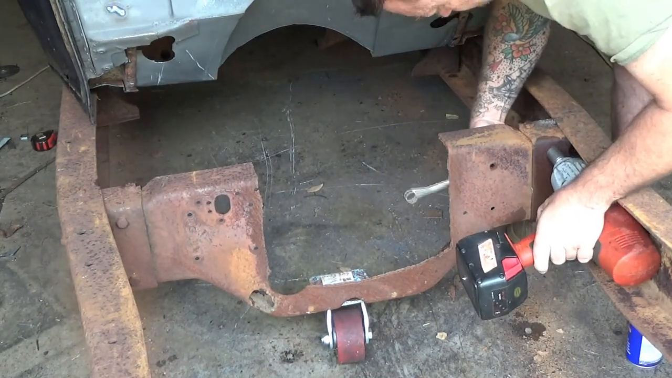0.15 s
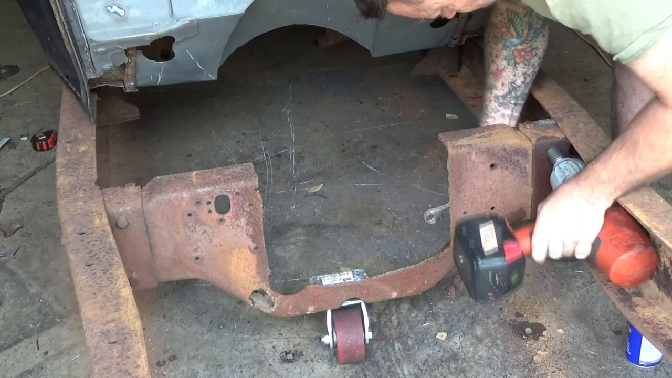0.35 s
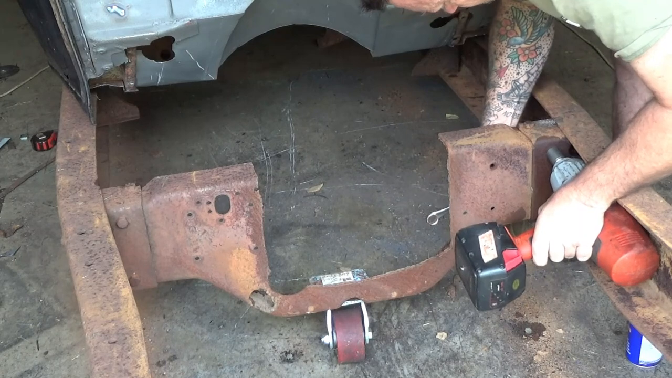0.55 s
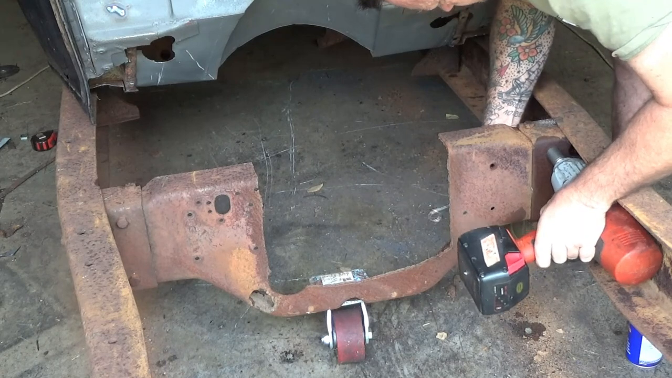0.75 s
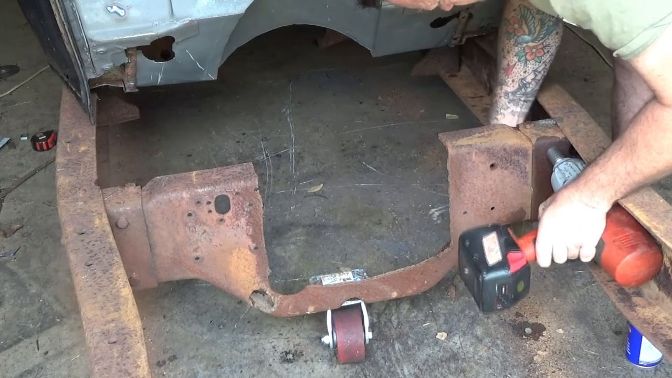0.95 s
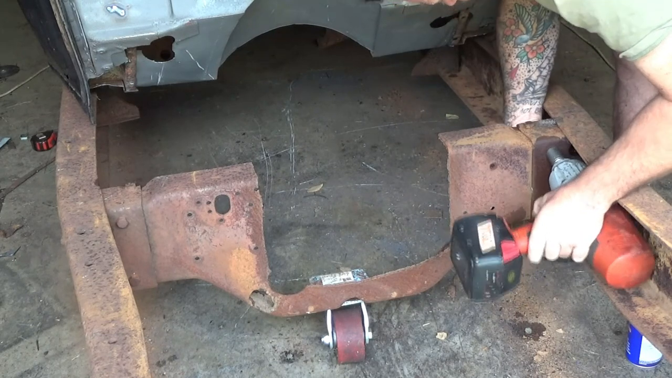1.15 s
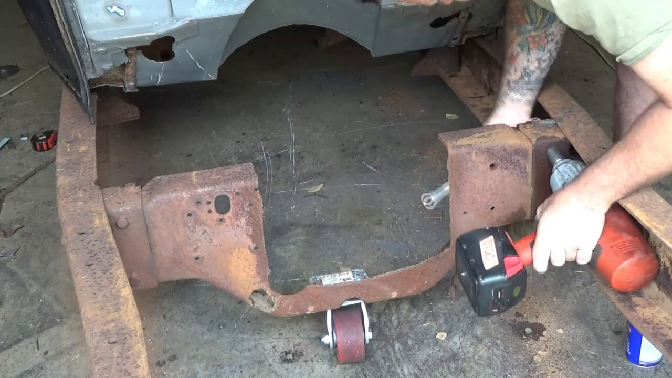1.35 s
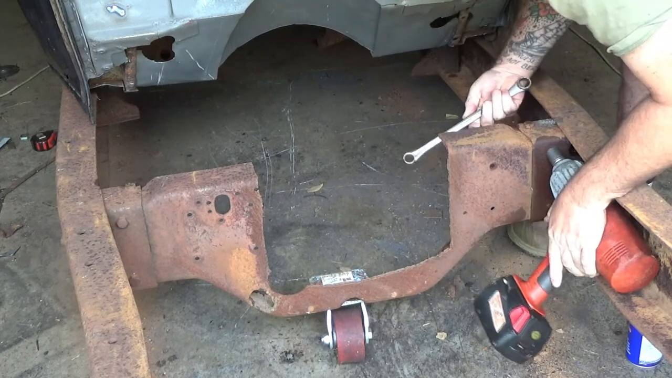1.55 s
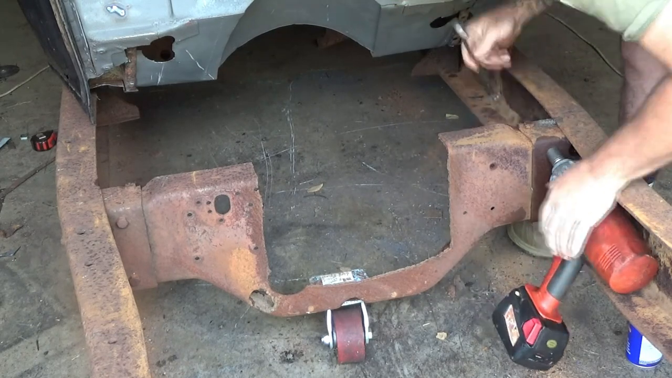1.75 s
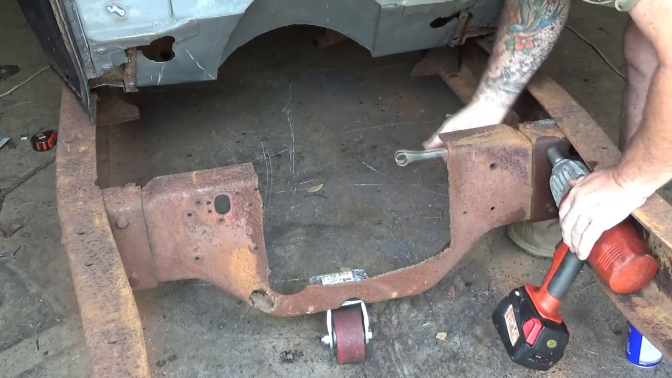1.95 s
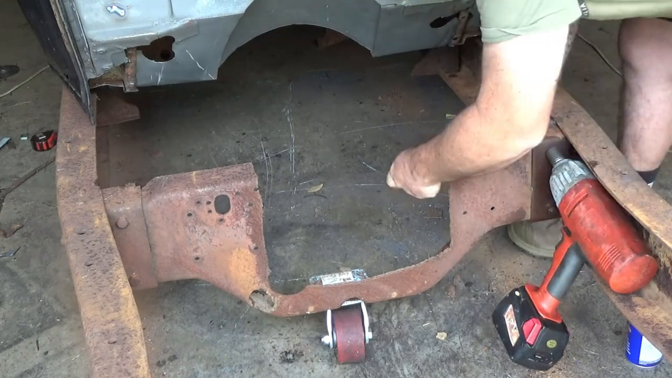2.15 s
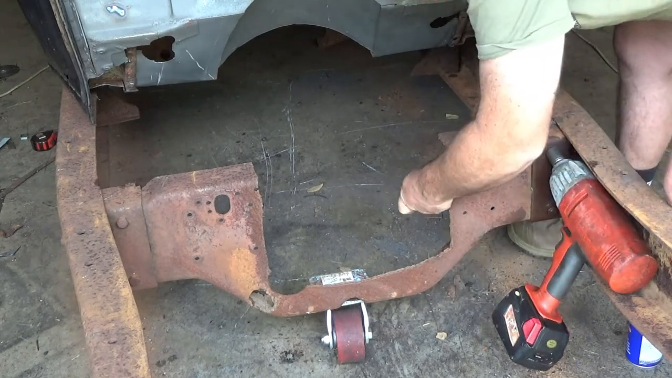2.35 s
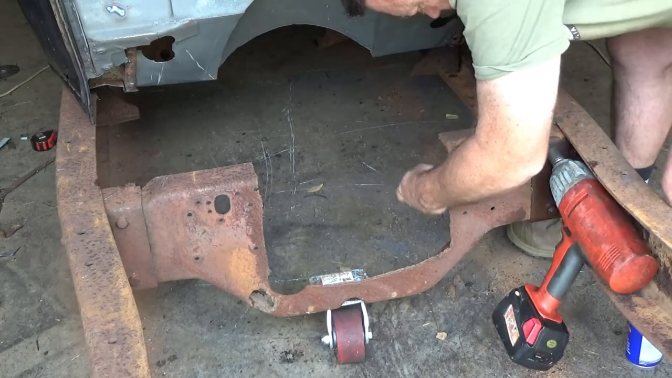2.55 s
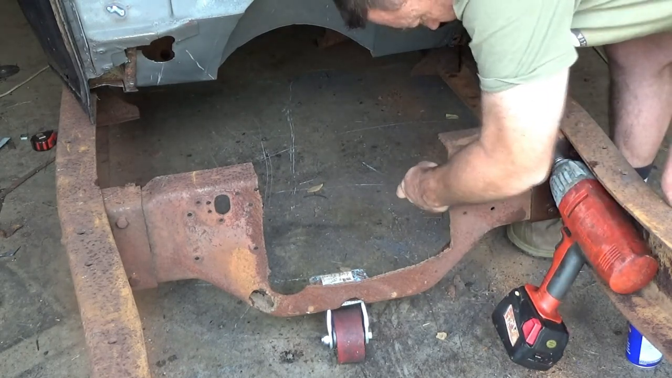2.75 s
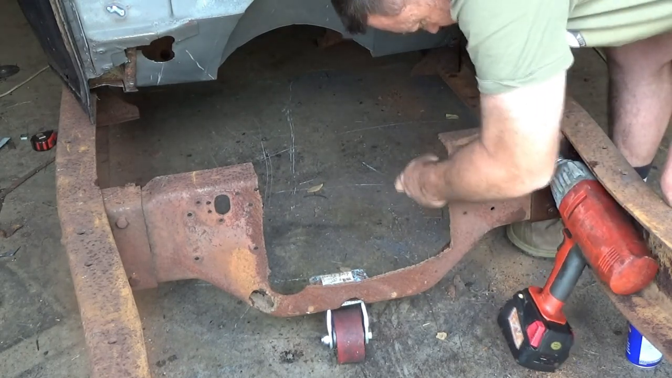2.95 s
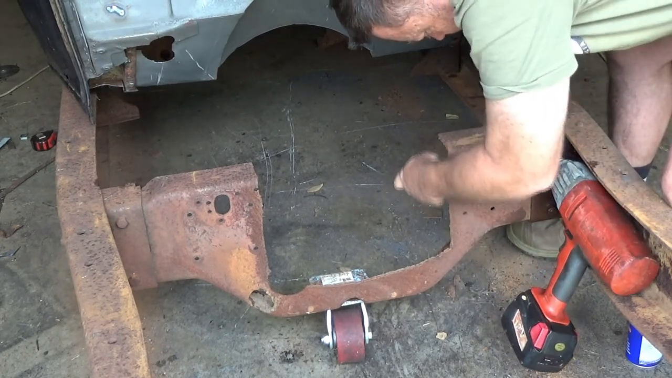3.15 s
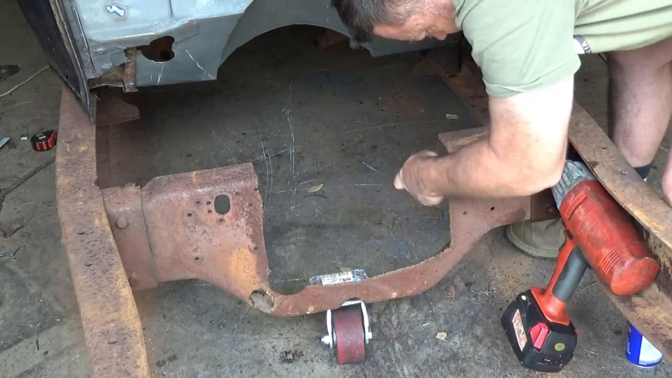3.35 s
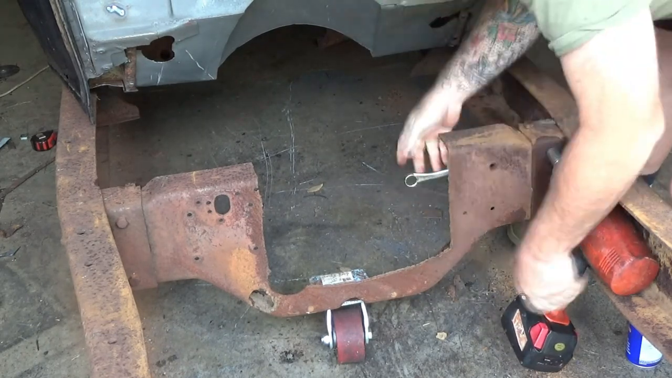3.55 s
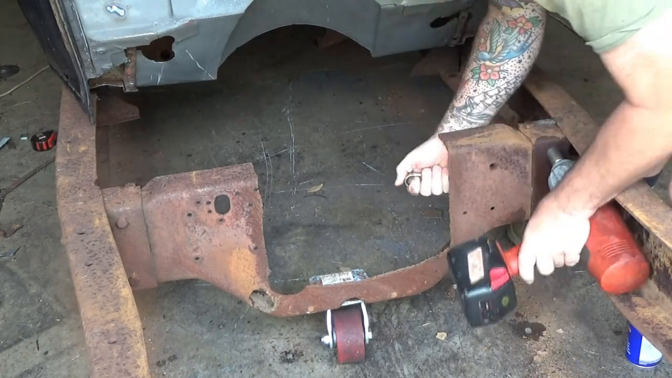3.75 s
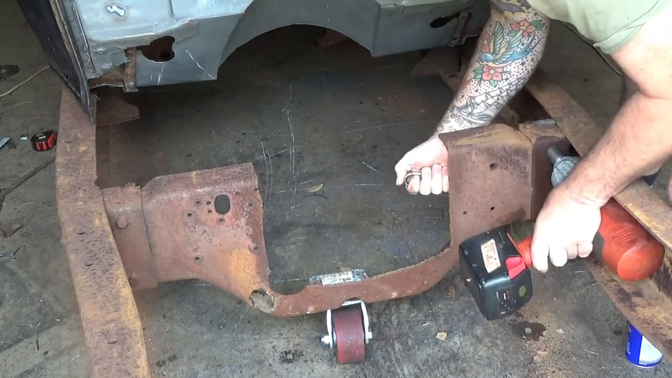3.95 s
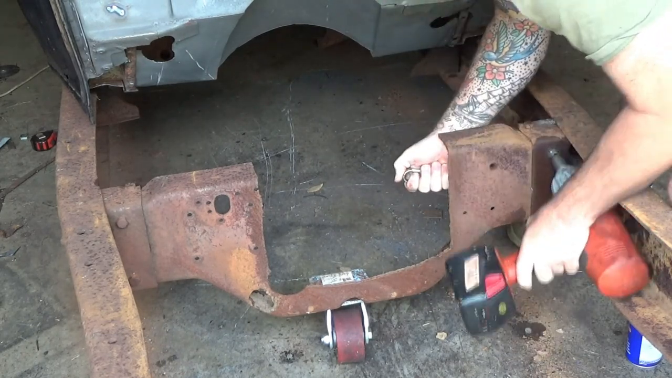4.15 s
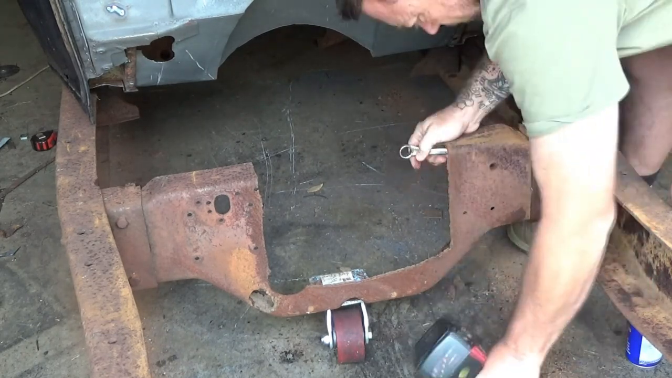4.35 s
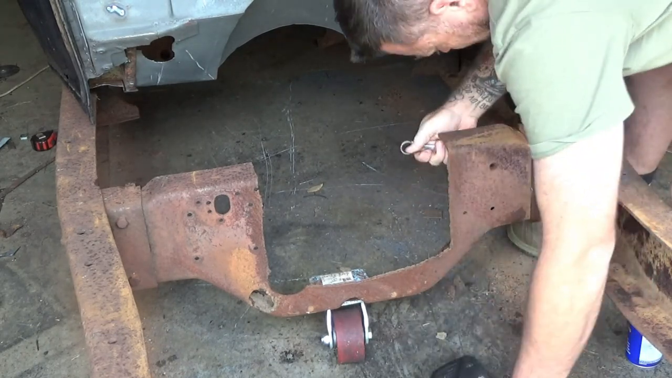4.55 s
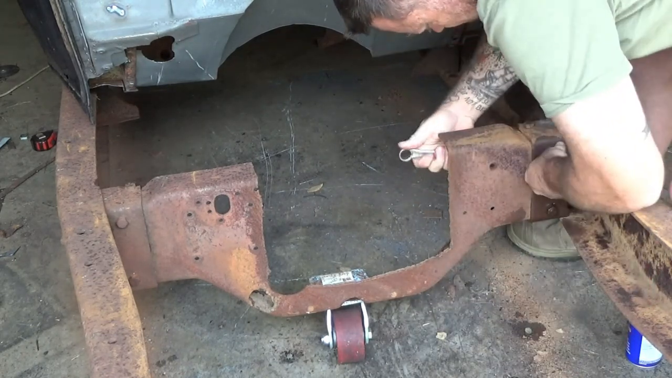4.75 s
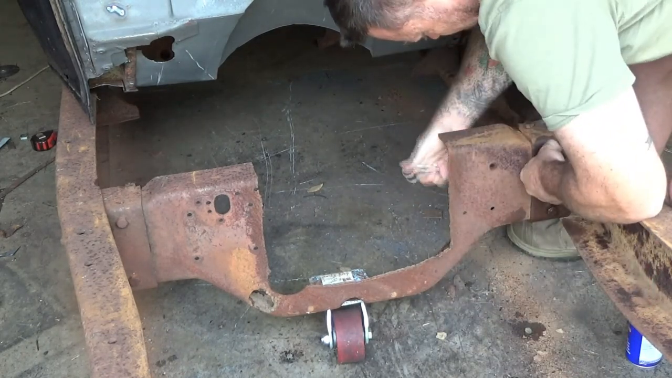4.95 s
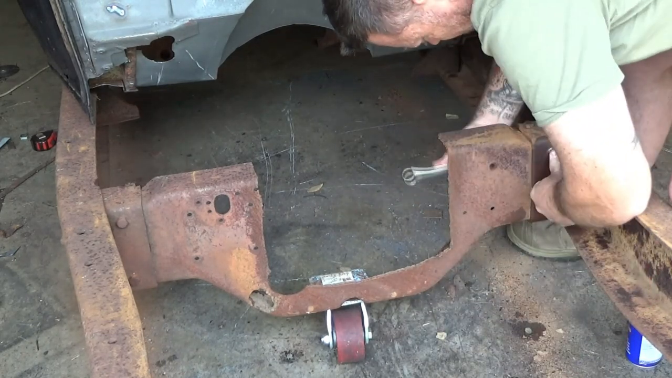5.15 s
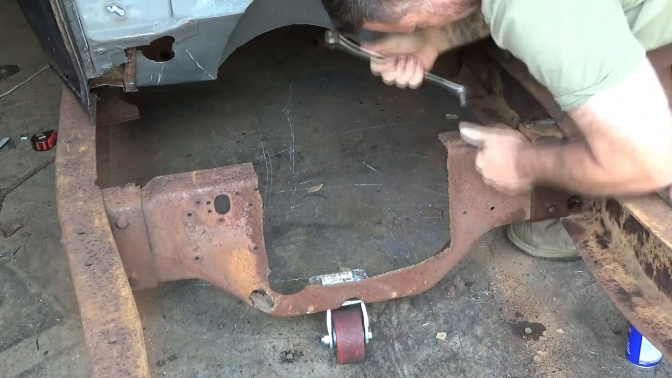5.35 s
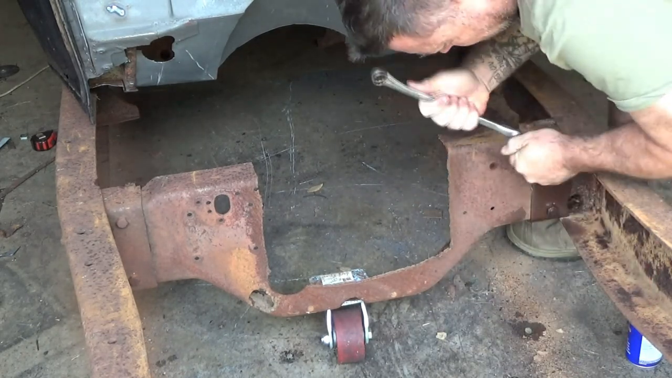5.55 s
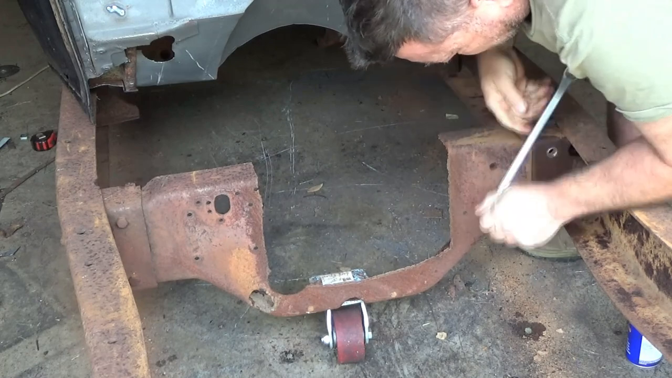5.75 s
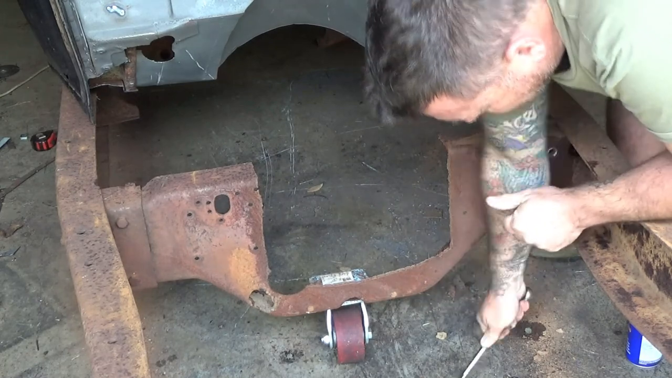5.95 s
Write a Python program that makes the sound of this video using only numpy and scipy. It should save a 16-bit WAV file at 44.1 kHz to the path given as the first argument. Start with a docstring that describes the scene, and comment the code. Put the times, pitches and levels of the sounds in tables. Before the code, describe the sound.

A cordless impact wrench rattles on a bolt in two short bursts, with metal tools knocking and clinking on a steel frame between and after.

```python
"""In a garage, hands shuffle and tools knock on a rusty steel frame, which rings and booms. A cordless
impact wrench rattles on a bolt in a short burst, its hammer striking while its gears grind. Very high
chirps and a faint trill come and go as a spanner and the wrench knock on the steel. After a soft thump
the wrench rattles again and more knocks follow. Last, the spanner is dragged on the steel and clinks
down on the concrete. The quiet hiss of the room lies under it all."""
import sys
import numpy as np
from scipy import signal
from scipy.fft import rfft, irfft
from scipy.io import wavfile
from scipy.ndimage import uniform_filter1d

SR = 44100
rng = np.random.default_rng(int(sys.argv[2]) if len(sys.argv) > 2 else 0)


def log_audio(samples):
    """Write samples as a 16-bit WAV file to the path given in sys.argv[1]."""
    # one column per channel
    frames = np.atleast_2d(samples).T
    # limit to full scale, then quantise
    limited = np.clip(frames, -1, 1)
    pcm = np.round(limited * 32767).astype(np.int16)
    wavfile.write(sys.argv[1], SR, pcm)


N = 268128
CREST_DB = 11.5  # how far the peak of a noisy hit stands over its average (rms) level


def gain_of(db):
    """Turns decibels into a number to multiply by."""
    return 10 ** (np.asarray(db) / 20)


def unit_rms(x):
    """Scales a signal to an average (rms) size of 1."""
    return x / np.sqrt(np.mean(x ** 2) + 1e-20)


def value_at(points, hz):
    """Reads a curve of (f/Hz, value) points, giving each octave about equal room."""
    f, value = np.transpose(points)
    return np.interp(np.log(hz + 1), np.log(f + 1), value)


def follow(rows, t):
    """Reads rows of (t/s, level/dB, ...) at times t; silent before and after them."""
    times, level_db, *rest = np.transpose(rows)
    return [np.interp(t, times, level_db, -120, -120)] + [np.interp(t, times, column) for column in rest]


def add(mix, s, sound):
    """Mixes a sound in at s seconds."""
    part = mix[..., max(round(s * SR), 0):][..., :sound.shape[-1]]
    part += sound[..., :part.shape[-1]]


def split(x, low_hz, high_hz):
    """Splits x into bass, middle and treble that add up to x."""
    hz, spectrum = np.fft.rfftfreq(x.shape[-1], 1 / SR), rfft(x)
    low, high = 1 / (1 + (hz / low_hz) ** 4), 1 / (1 + (high_hz / (hz + 1)) ** 4)
    return [irfft(spectrum * band, x.shape[-1]) for band in (low, 1 - low - high, high)]


def noise(colour, patchy_db, size=512, count=N):
    """Stereo noise whose colour (its level at each frequency) drifts in random patches."""
    # how alike left and right are: f/Hz, likeness (1 = the same)
    likeness = [(60, 0.73), (180, 1), (550, 0.87), (1650, 0.74), (4970, 0.83), (15000, 0.24)]
    frames, hz = 4 * count // size + 5, np.fft.rfftfreq(size, 1 / SR)
    a, b, c, d, patches = rng.standard_normal((frames, len(hz), 5)).T
    patches = unit_rms(uniform_filter1d(uniform_filter1d(patches, size=8, axis=0), size=10, axis=1))
    same, left = value_at(likeness, hz)[:, None], a + 1j * b
    right = same * left + np.sqrt(1 - same ** 2) * (c + 1j * d)
    spectra = np.array([left, right]) * gain_of(value_at(colour, hz)[:, None] + patchy_db * patches)
    return unit_rms(signal.istft(spectra, nperseg=size, noverlap=size - size // 4)[1][:, :count])


def room_tone(loud):
    """The room's quiet hiss sinks under loud sounds and creeps back afterwards."""
    # colour of the hiss: f/Hz, level/dB
    colour = [(15, -49), (25, -42.5), (394, -0.5), (476, -6.5), (560, 1), (1160, -10.5), (1790, -17.5),
              (2550, -13), (3720, -25), (5000, -21.5), (16000, -10.5)]
    loud_db = 10 * np.log10(abs(uniform_filter1d((loud ** 2).mean(0), size=400)) + 1e-12)
    ramp_db = 54 * np.arange(N) / SR
    held_db = np.maximum.accumulate(loud_db + ramp_db) - ramp_db  # jumps up at once, falls slowly
    dip_db = 0.3 * np.maximum(held_db + 47.5, 0)
    return gain_of(-70 - dip_db) * noise(colour, patchy_db=2.5, size=1024)


def shuffle():
    """Hands and tools rustle in the background: noise roughened by small random ticks."""
    # level and brightness of the rustle, which dulls after loud sounds: t/s, level/dB, treble boost/dB
    rustle_curve = [(0.0, -63, 9), (0.045, -74.5, -13), (0.085, -61, -4), (0.172, -67.5, 5), (0.37, -73, 6),
                    (1.0, -45.5, -29), (1.266, -74, -30.5), (1.488, -67.5, -3.5), (1.598, -71, -1),
                    (2.022, -70, 2.5), (2.36, -64, 1.5), (3.024, -64.5, 0.5), (3.202, -59.5, 1.5),
                    (3.42, -64.5, -2), (3.52, -58.5, 0), (4.2, -58, -11), (4.328, -51.5, -47),
                    (4.644, -70, 5), (4.828, -64.5, -7.5), (5.2, -69, 4.5), (5.37, -63, -3.5),
                    (5.696, -68.5, 3.5), (5.886, -60.5, 1.5), (6.08, -68, 2)]
    rustle = noise([(300, -14.5), (900, -4), (4000, -8.5), (9000, -6), (15000, -7)], patchy_db=3)
    bass, middle, treble = map(unit_rms, split(rustle, 740, 5000))
    ticks = (rng.random(N) < 30 / SR) * rng.exponential(1, N)  # about 30 a second
    grain = 1 + 0.077 * signal.oaconvolve(ticks, np.exp(-np.arange(1500) / SR / 0.0022))[:N]
    level_db, treble_db = follow(rustle_curve, np.arange(N) / SR)
    return grain * gain_of(level_db) * (gain_of(-9.5) * bass + middle + gain_of(treble_db) * treble)


def ring(hz, t60, t):
    """One dying note of struck metal; t60 is the time it takes to fade by 60 dB."""
    note = np.sin(2 * np.pi * hz * t) * gain_of(-60 * t / t60)
    return note / np.linalg.norm(note)


def steel_frame(t, spread_db=0):
    """The tapped frame rings with many notes; spread_db varies their mix, as if hit on another spot."""
    # the frame's notes: f/Hz, level/dB, t60/s (cut to 0.05 at most below)
    notes = [(1430, -3.5, 0.3), (1885, -3, 0.18), (2120, -24, 0.16), (2504, -3, 0.19), (3230, -5, 0.089),
             (3252, -18.5, 0.13), (3735, -2.5, 0.084), (4450, -1.5, 0.067), (4750, -2.5, 0.1),
             (6060, -16.5, 0.095), (6078, -19, 0.052), (6620, -3, 0.031), (9540, 0.5, 0.063)]
    spot_db = spread_db * rng.standard_normal(len(notes))
    ringing = sum(gain_of(db + extra_db) * ring(hz, min(t60, 0.05), t)
                  for extra_db, (hz, db, t60) in zip(spot_db, notes))
    return ringing / np.linalg.norm(ringing)


def rise_time(t60):
    """Seconds a hit takes to swell: short ticks also start fast."""
    return np.clip(t60 / 7, 0.001, 0.013)


def tool_hit(db, hz, bass_db, treble_db, t60, frame, tool_share, bass_slope):
    """A gritty contact swells and dies, ringing the tool and any frame it hits; the bass lingers."""
    t = np.arange(6144) / SR
    rise, t60 = rise_time(t60), np.clip(t60, 0.02, 0.2)
    hiss = rng.standard_normal((2, len(t)))
    hiss *= gain_of(2 * unit_rms(uniform_filter1d(rng.standard_normal(len(t)), size=60)))
    grit = rfft([hiss[0], 0.87 * hiss[0] + 0.52 * hiss[1]])  # left and right mostly alike
    band_hz = np.array([700, np.sqrt(700 * hz), hz, 7500])
    # bass_slope is the share of bass_db reached halfway down from the tool's note
    band_db = np.array([bass_db, bass_slope * bass_db, 0, treble_db]) - 10 * np.log10(band_hz / hz)
    colour = [(60, band_db[0] - 74), (250, band_db[0] - 14.5), *zip(band_hz, band_db),
              (10000, band_db[3] - 5), (16000, band_db[3] - 33)]
    shaped = grit * (1 + rfft(frame, len(t))) * gain_of(value_at(colour, np.fft.rfftfreq(len(t), 1 / SR)))
    bass, middle, treble = split(irfft(shaped), 1200, 6400)
    tool = tool_share * unit_rms(irfft(grit * rfft(ring(hz, 0.025, t))))
    swell = np.sin(np.pi / 2 * np.minimum(t / rise, 1))
    fade = gain_of(-60 * np.maximum(t - rise, 0) / t60)
    contact = (fade ** 0.52 * bass + fade * middle + fade ** 1.1 * treble) / middle.std()
    ending = np.cos(np.pi / 2 * t / t[-1])
    return gain_of(db - CREST_DB) * swell * ending * (contact + fade * tool)


def knocks():
    """The spanner and the wrench knock on the frame, each time on another spot."""
    # tools on steel: t/s, level/dB, tool's note f/Hz, bass boost/dB, treble boost/dB, t60/s (0.2 at most)
    hits = [(0.13, -45, 1530, -15, -3, 0.28), (0.148, -45, 3500, -14, -13, 0.08),
            (0.166, -26, 1790, -10, -21, 0.075), (0.2258, -30, 1460, -17.5, -14, 0.17),
            (0.2333, -21, 3710, -17.5, -8, 0.056), (0.329, -46, 1280, -16, 2, 0.21),
            (1.058, -24, 2040, -21, -16, 0.091), (1.0831, -18.5, 3550, -14.5, -7, 0.08),
            (1.1, -24, 4400, -12, -13, 0.08), (1.155, -36, 2350, -9.5, -7.5, 0.11),
            (1.2119, -49.5, 1320, 4.5, -6, 0.2), (1.276, -34, 1960, -15.5, -7, 0.056),
            (1.455, -57.5, 1300, -4, -9.5, 0.19), (1.5354, -54, 3500, -15.5, -2.5, 0.11),
            (1.9781, -18, 1910, -32, -7.5, 0.065), (2.0057, -18.5, 3520, -23, -6.5, 0.098),
            (2.0435, -36.5, 1740, 0.5, -2, 0.16), (2.2107, -39, 1570, -11, -9, 0.1),
            (2.231, -40.5, 1250, -2.5, 4, 0.19), (2.265, -51, 980, 6, -10, 0.17),
            (2.35, -52, 1000, 1, -29, 0.22), (2.387, -35.5, 1430, -4, -12, 0.21),
            (2.4175, -17.5, 1910, -14, -4.5, 0.084), (2.537, -43, 3430, -11, 1, 0.11),
            (2.596, -44, 4480, -24, 5, 0.077), (2.711, -46.5, 5800, -4, 6, 0.12),
            (2.7555, -45, 2710, -10, 10, 0.12), (2.7886, -18.5, 2445, -22, 12, 0.054),
            (2.9, -42, 2700, -17, -2, 0.11), (3.0746, -51, 3440, -16, 29, 0.035),
            (3.1077, -43, 2540, -38, -10, 0.12), (3.1366, -44, 2910, -15, 13, 0.039),
            (3.1954, -44, 4230, -14, 4, 0.16), (3.25, -45, 1880, -14, 9, 0.067),
            (3.3013, -44, 1910, -31, 0, 0.17), (3.3832, -47.5, 3480, -18, 6, 0.086),
            (3.483, -48.5, 1320, -12, 5, 0.22), (3.5563, -48, 3500, -25, 8, 0.065),
            (3.692, -38.5, 1680, -10, -10, 0.13), (3.706, -32, 1980, -13, -6, 0.093),
            (3.8021, -21.5, 1940, -10, -16, 0.28), (4.2555, -20.5, 1280, -4, -13, 0.17),
            (4.2988, -29, 2900, -2.5, -0.5, 0.17), (4.357, -28, 4360, -11, 1, 0.1),
            (4.3665, -16, 4140, -11, 5.5, 0.065), (4.394, -37.5, 2240, -14, 8, 0.049),
            (4.4953, -42, 2830, -25, 12, 0.052), (4.5022, -25.5, 3380, -13.5, 3, 0.066),
            (4.5417, -34, 3920, -13.5, -4.5, 0.1), (4.5574, -43.5, 1910, -12, -1, 0.082),
            (4.618, -42, 2040, -2, -7, 0.16), (4.6604, -9, 2960, -11.5, 0, 0.073),
            (4.6882, -26.5, 3380, -21, -1, 0.061), (4.8062, -44.5, 3100, -28, -2.5, 0.2),
            (4.8513, -44, 1370, -33, -6, 0.1), (4.944, -48.5, 1220, -6, -18.5, 0.085),
            (4.971, -43, 3130, -19, -8, 0.12), (5.025, -50, 1340, 2, 5, 0.087),
            (5.1857, -43.5, 1270, -5, -2.5, 0.085), (5.1962, -32.5, 1240, -1, -3, 0.11),
            (5.2367, -26, 1310, -10, -11, 0.23), (5.2518, -18, 1430, 0.5, -2, 0.072),
            (5.2786, -42, 1420, 9.5, -17, 0.22), (5.539, -48.5, 2420, -21, -10, 0.076),
            (5.6228, -26, 2280, -57, -6, 0.033)]
    out, t = np.zeros((2, N)), np.arange(2000) / SR
    for s, *hit, t60 in hits:
        frame = 0.36 * steel_frame(t, spread_db=5)
        add(out, s - 0.39 * rise_time(t60), tool_hit(*hit, t60, frame, tool_share=0.35, bass_slope=0.59))
    return out


def boom():
    """The big frame rings low and slow when it is bumped."""
    # bumps on the frame: t/s, level/dB
    bumps = [(0.17, -63), (0.25, -61.5), (0.98, -49), (1.08, -59), (2.0, -66), (2.07, -60), (2.26, -59.5),
             (2.42, -54), (2.9, -66), (3.35, -68), (3.49, -65), (3.71, -61), (3.81, -49), (4.251, -40),
             (4.659, -61), (5.0, -67), (5.2, -50), (5.26, -59), (5.8, -74), (5.985, -71)]
    # colour of the boom: f/Hz, level/dB
    colour = [(100, -44.5), (190, -17.5), (245, 1), (300, -8), (500, -6.5), (900, -42.5)]
    rise_s, t60 = 0.012, 0.65
    t, level = np.arange(SR) / SR, np.zeros(N)
    for s, db in bumps:
        add(level, s, np.minimum(t / rise_s, 1) * gain_of(db - 60 * t / t60))
    return level * noise(colour, patchy_db=2.5, size=2048)


def hammer(pulse):
    """The wrench's hammer strikes in nearly even runs, with a lull as it lifts before each blow."""
    # runs of blows: first t/s, gap/s, end t/s, level/dB
    runs = [(0.374, 0.0187, 0.44, -9), (0.452, 0.0213, 0.59, -11.5), (0.605, 0.0245, 0.735, -11),
            (0.747, 0.0236, 0.97, -13), (3.829, 0.0242, 4.055, -12.5), (4.135, 0.029, 4.2, -17)]
    blows, lulls = np.zeros(N), np.zeros(N)
    for first, gap, end, db in runs:
        times = first + gap * np.arange(20)
        for s, (late, weak, deep) in zip(times[times < end], rng.standard_normal((20, 3))):
            s += 0.001 * late
            add(blows, s - 0.002, gain_of(db - 0.5 * weak - CREST_DB) * pulse)
            add(lulls, s - 0.007, 0.4 * np.clip(1 + 0.26 * deep, 0, 1.8) * np.hanning(260))
    return blows, lulls


def wrench():
    """Hammer blows and a loose socket shake the steel; the gears grind between them, duller when slow."""
    # the two bursts, each a list of: t/s, level/dB
    bursts = [
        [(0.355, -66.5), (0.375, -30.5), (0.397, -26.5), (0.41, -23.5), (0.453, -21), (0.93, -22),
         (0.97, -19.5), (0.988, -24.5), (1.002, -38.5), (1.04, -63)],
        [(3.82, -38.5), (3.834, -26), (3.894, -19), (4.044, -20.5), (4.086, -27.5), (4.198, -37), (4.235, -94)],
    ]
    # colour of the rattle: f/Hz, level/dB
    colour = [(18, -68), (30, -38), (149, -39), (319, -13), (374, -21.5), (666, -7.5), (1350, -2.5),
              (1500, -2), (1810, -2), (2750, -1.5), (2980, -3.5), (4780, -2.5), (8980, -2), (16000, -25.5)]
    full_speed_db = -25
    t = np.arange(N) / SR
    pulse = (1 - np.exp(-t[:3000] / 0.0015)) * np.exp(-t[:3000] / 0.0079)
    chatter = (rng.random(N) < 120 / SR) * rng.random(N)  # about 120 socket taps a second
    shake = 0.63 + 0.39 * signal.oaconvolve(chatter, pulse)[:N]
    gears = noise(colour, patchy_db=1.34)
    ringing = signal.oaconvolve(rng.standard_normal(N), steel_frame(t[:4000]))[:N]
    bass, middle, treble = map(unit_rms, split(gears + 0.054 * ringing, 880, 6000))
    blows, lulls = hammer(pulse)
    onsets = np.maximum(np.diff(blows, prepend=0), 0)
    crack = signal.oaconvolve(onsets, np.exp(-t[:400] / 0.00067))[:N]  # the hammer meets the anvil
    level_db = np.maximum(*[follow(burst, t)[0] for burst in bursts])
    slow_db = np.clip(full_speed_db - level_db, 0, 30)
    rattle = gain_of(-20 + 0.55 * slow_db) * bass + middle + gain_of(-7.5 - slow_db) * treble
    drive = (gain_of(level_db) * shake + blows + 0.44 * crack) * np.clip(1 - lulls, 0.2, 1)
    return drive * rattle


def chirps():
    """Short wavering whistles near the top of hearing."""
    # one chirp a row: t/s, level/dB, f/Hz
    whistles = [(1.3408, -70.5, 11900), (1.382, -60, 11400), (1.43, -57.5, 11560), (1.476, -62.5, 11100),
                (1.504, -59, 11300), (1.558, -64.5, 10800), (1.5814, -50, 11000), (1.675, -55, 11800),
                (2.876, -60, 12000), (2.993, -61, 12200), (3.035, -57, 11700)]
    out, count = np.zeros(N), round(0.019 * SR)
    for s, db, hz in whistles:
        waver = 1 + 0.018 * unit_rms(uniform_filter1d(rng.standard_normal(4000), size=60))[:count]
        whistle = np.sin(2 * np.pi * np.cumsum(hz * waver) / SR)
        add(out, s - 0.003, gain_of(db) * np.hanning(count) * whistle)
    return out


def trill():
    """A narrow band of noise glides and throbs a little, like a far insect or a faint squeak."""
    # thin fuzzy whistles: start t/s, length/s, level/dB, first f/Hz, last f/Hz
    whistles = [(1.395, .44, -68, 3610, 3590), (2.98, .15, -63, 3430, 3490), (3.31, .11, -68, 3610, 3570),
                (3.11, .1, -60, 2770, 3030)]
    out, width_hz = np.zeros(N), 210
    for start, length, db, from_hz, to_hz in whistles:
        t = np.arange(0, length, 1 / SR)
        hz = from_hz + (to_hz - from_hz) * t / length
        a, b = rng.standard_normal((2, SR))[:, :len(t)]
        fuzz = signal.sosfilt(signal.butter(2, width_hz / 2, fs=SR, output="sos"), a + 1j * b)
        whistle = unit_rms((fuzz * np.exp(2j * np.pi * np.cumsum(hz) / SR)).real)
        throb = 1 + 0.16 * np.sin(2 * np.pi * 30 * t)
        add(out, start, gain_of(db) * signal.windows.tukey(len(t), 0.27) * whistle * throb)
    return out


def thump():
    """A soft bump: one low note that starts gently and dies away."""
    start_s, db, hz, t60 = 3.495, -61, 120, 0.23
    t, out = np.arange(SR // 2) / SR, np.zeros(N)
    swell = 1 - np.exp(-t / 0.0041)
    add(out, start_s, gain_of(db - 60 * t / t60) * swell * np.sin(2 * np.pi * hz * t))
    return out


def drag():
    """The spanner is dragged on steel, and the rubbing makes it sing in a few bands."""
    # colour of the singing spanner: f/Hz, level/dB
    colour = [(290, -47), (500, -36), (650, -9), (729, 14), (1040, 10), (1320, -38), (1510, 18),
              (1870, -27), (2240, 4), (2500, -13), (3250, -34), (5500, -120)]
    start_s, length_s, db = 5.745, 0.215, -62.5
    out, count = np.zeros((2, N)), round(length_s * SR)
    rub = noise(colour, patchy_db=5.5, size=1024, count=SR // 3)[:, :count]
    add(out, start_s, gain_of(db) * signal.windows.tukey(count, 0.15) * rub)
    return out


def clink():
    """The spanner is laid on the concrete, away from the frame: one ringing clink that swells quickly."""
    # three overlapping strikes: t/s, level/dB, spanner's note f/Hz, bass boost/dB, treble boost/dB, t60/s
    strikes = [(5.973, -21, 3900, -25, -3, 0.077), (5.9805, -13, 3550, -30, -7, 0.11),
               (5.9913, -17.5, 3450, -24, -5, 0.1)]
    out = np.zeros((2, N))
    for s, *hit, t60 in strikes:
        strike = tool_hit(*hit, t60, frame=np.zeros(1), tool_share=1.1, bass_slope=0.91)
        add(out, s - 0.55 * rise_time(t60), strike)
    return out


def garage(x):
    """The garage answers with many small echoes, each band dying at its own speed."""
    # how long the echoes last: f/Hz, t60/s
    fade_times = [(200, 0.17), (600, 0.19), (1500, 0.45), (4000, 0.12), (10000, 0.66)]
    echoes = np.zeros((2, SR // 2))
    slots = np.arange(300, SR // 2 - 20, 20)  # one echo in every 20 samples
    arrivals = slots + rng.integers(0, 20, (2, len(slots)))
    np.put_along_axis(echoes, arrivals, rng.choice([-1., 1.], arrivals.shape), 1)
    hz, t, spectra = signal.stft(echoes, SR, nperseg=256)
    fade = gain_of(-60 * t / value_at(fade_times, hz)[:, None])
    tail = signal.istft(spectra * fade, SR, nperseg=256)[1]
    return signal.fftconvolve(x[None], tail / np.linalg.norm(tail[0]), axes=1)[:, :N]


def scene():
    """Mixes all the sounds; only the loud ones echo in the garage."""
    bass_cut = signal.butter(2, 140, "high", fs=SR, output="sos")  # small tools push no deep bass
    loud = wrench() + signal.sosfilt(bass_cut, knocks() + clink())
    quiet = room_tone(loud) + shuffle() + boom() + drag() + thump() + trill() + chirps()
    return loud + gain_of(-28.5) * garage(loud.mean(0)) + quiet


def record(dry):
    """Two microphones, the right a bit louder, alike in the bass and top treble; both extremes are cut."""
    left, right = dry * gain_of([[-0.335], [0.335]])
    stereo_band = signal.butter(2, (250, 9500), "band", fs=SR, output="sos")
    side = 0.4 * signal.sosfiltfilt(stereo_band, left - right)
    pair = (left + right) / 2 + np.array([side, -side])
    thinned = signal.sosfilt(signal.butter(1, 60, "high", fs=SR, output="sos"), pair)
    treble_cut = signal.firwin(511, 15800, window=("kaiser", 9), fs=SR)
    return signal.oaconvolve(thinned, treble_cut[None], "same")


dry = scene()
out = record(dry)
log_audio(out)
```